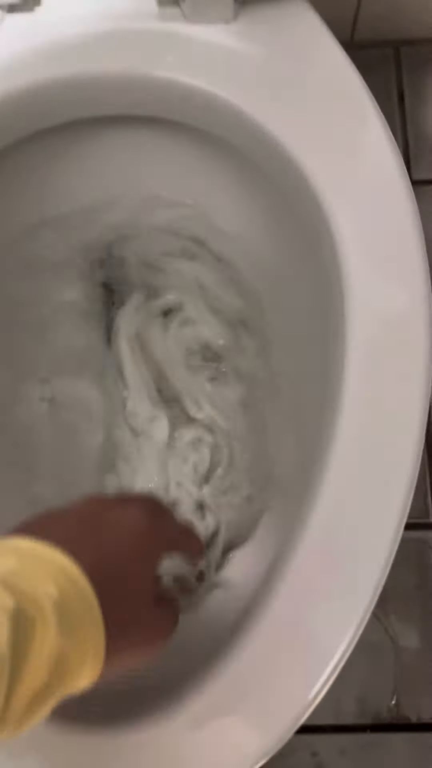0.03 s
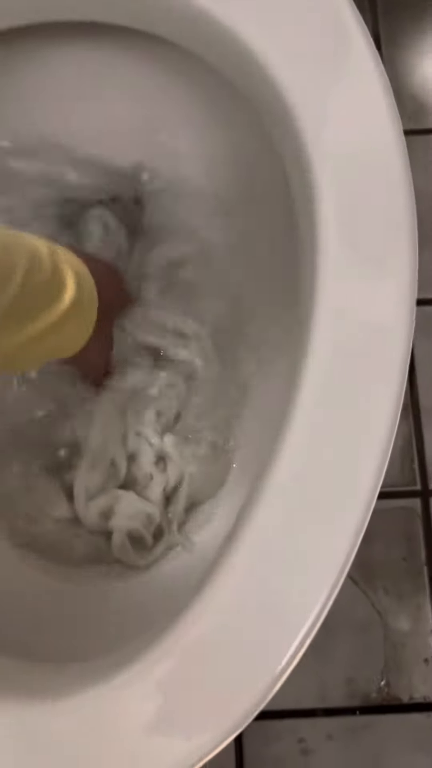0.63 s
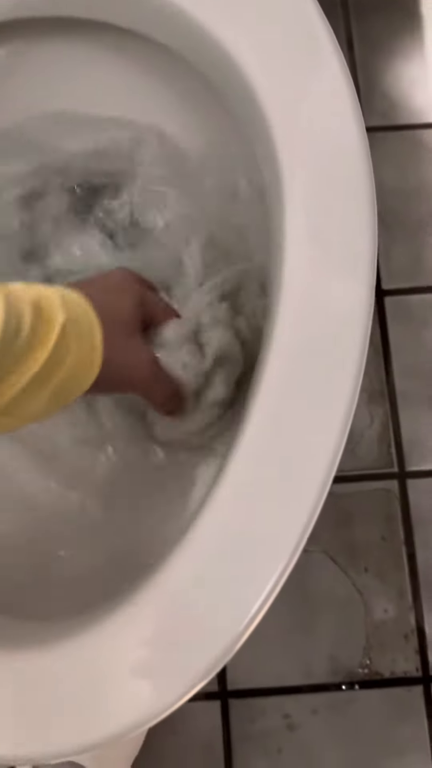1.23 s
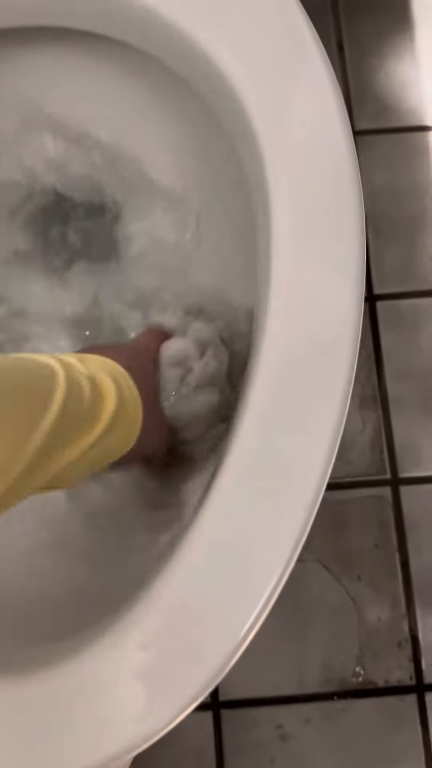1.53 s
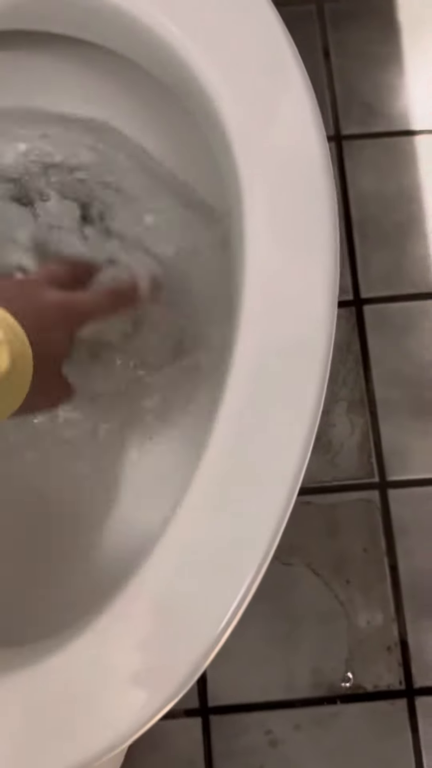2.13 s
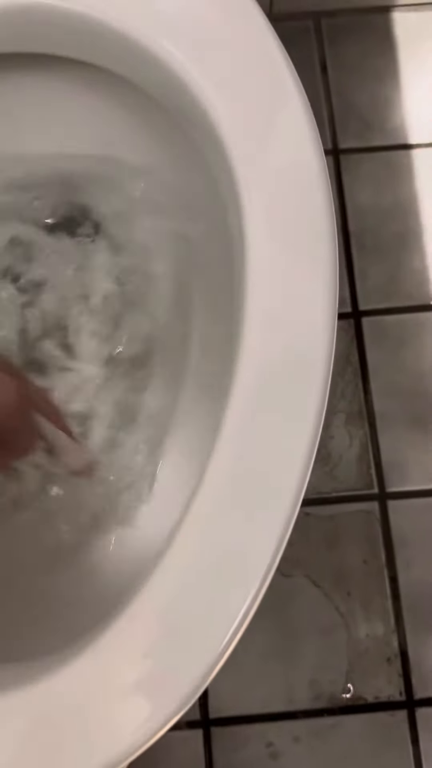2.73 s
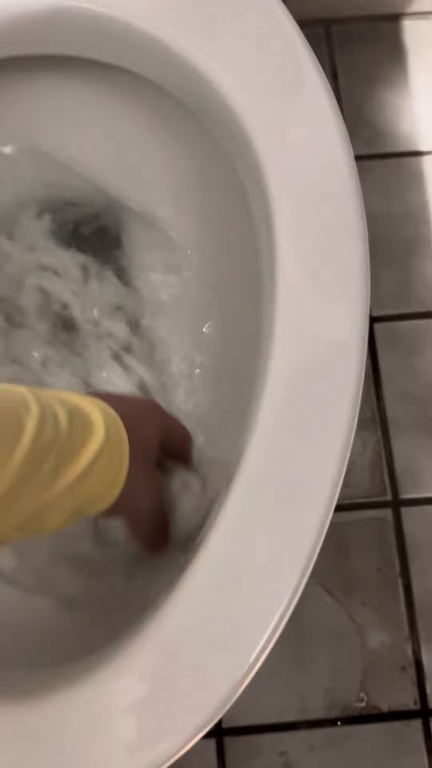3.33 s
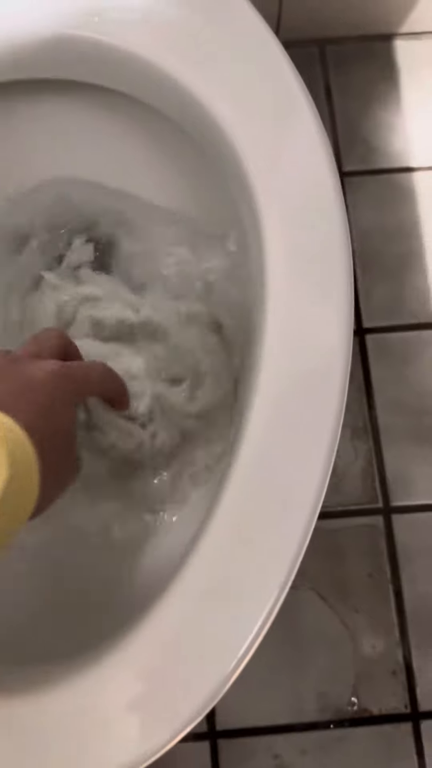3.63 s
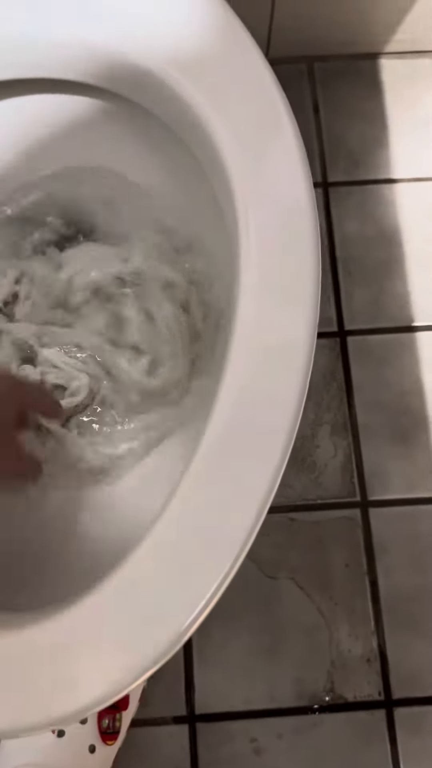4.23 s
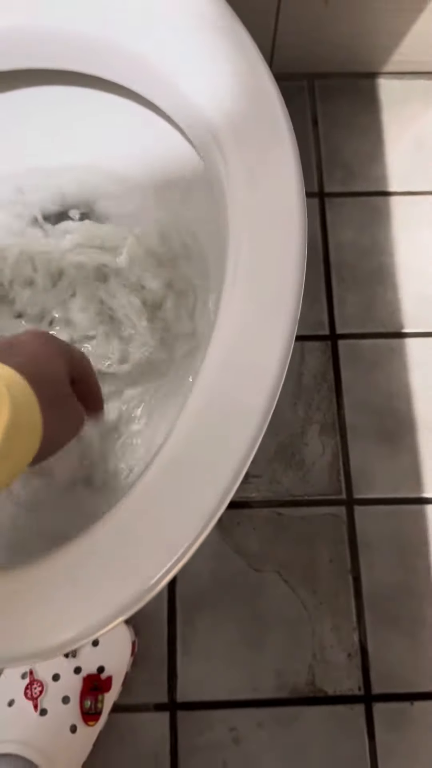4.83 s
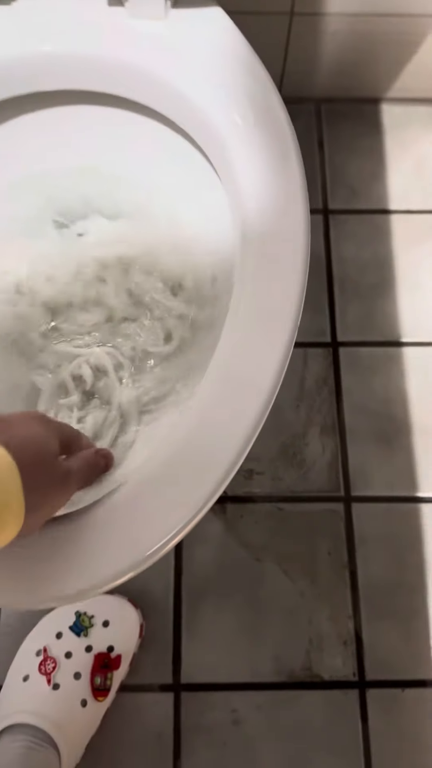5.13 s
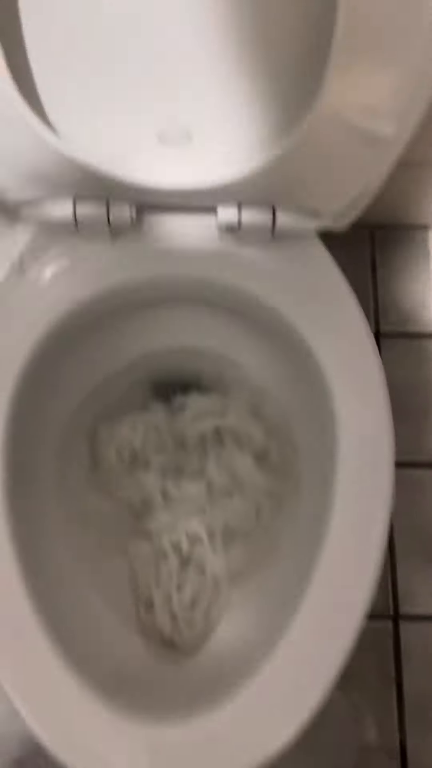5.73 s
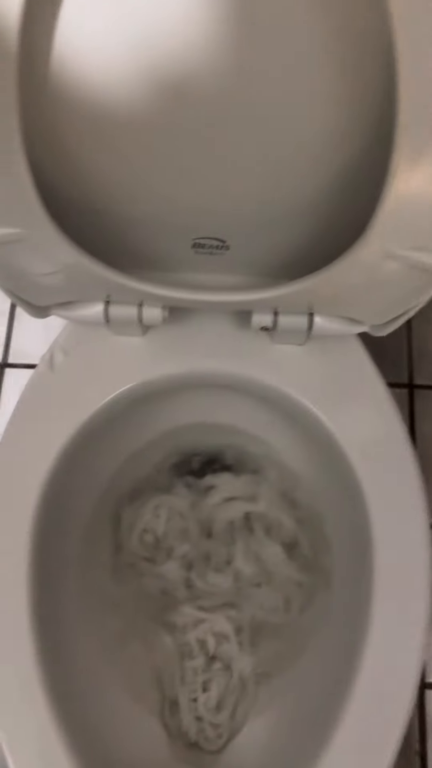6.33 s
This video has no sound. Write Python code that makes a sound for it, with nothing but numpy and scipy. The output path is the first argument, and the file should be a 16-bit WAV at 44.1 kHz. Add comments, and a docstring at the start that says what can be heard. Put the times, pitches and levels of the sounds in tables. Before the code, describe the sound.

A toilet runs on after a flush in a small tiled restroom, heard close on a hand-held microphone. Throughout, the valve hisses steadily, the pipes drone low and water washes down the bowl with a faint hollow roar. In the first 0.3 seconds, fingers rub and lightly bump the microphone. From the start until about 5 seconds, a hand stirs a sodden wad in the bowl: water sloshes in uneven surges and slaps the porcelain, with snapping drops and bubbly plops, all briefly echoed by the tiles. A sharp drip and plop stand out at 0.3 seconds, with clusters of splashes around 1.3 to 2.3 and 2.8 to 3.8 seconds. From about 4.6 seconds, as the stirring ends, a faint singing tone rises in the filling bowl. From 5.9 seconds, fingers rub and bump the microphone with a dull rumble, ending in a short scrape near 6.4 seconds.

```python
"""A toilet runs on after a flush in a small tiled restroom: throughout, turbulent flow hisses in the
valve, drones in the pipes and washes down the bowl. At first, fingers rub and bump a hand-held camera.
For five seconds a hand stirs a sodden wad in the bowl: water sloshes and slaps the porcelain, drops snap
and trapped air rings in plops, all echoed by the tiles. As the stirring ends, the stream sings in the
filling bowl. Last, the fingers rub and bump the camera again, ending in a scrape."""
import sys
import numpy as np
from scipy import signal
from scipy.fft import rfft, irfft, next_fast_len
from scipy.io import wavfile
from scipy.ndimage import uniform_filter1d, map_coordinates

SR = 44100
rng = np.random.default_rng(int(sys.argv[2]) if len(sys.argv) > 2 else 0)


def transcribe(signal):
    """Save signal, clipped to [-1, 1], as a 16-bit WAV file at the path in sys.argv[1]."""
    frames = np.atleast_2d(signal).T
    limited = np.clip(frames, -1, 1)
    pcm = np.round(limited * 32767).astype(np.int16)
    wavfile.write(sys.argv[1], SR, pcm)


N = 281799

# Spectra of the noise sources. Each row: frequency in Hz, relative spectral level in dB.
PIPE_SPECTRUM = [(15, -19), (28, -3), (40, -5), (65, 1.5), (100, 0), (160, -5), (260, -7), (350, -16),
                 (600, -25)]
TRAP_SPECTRUM = [(120, -40), (172, -13), (188, 1), (203, -5), (228, -13), (242, 3.5), (252, -4), (270, -20),
                 (350, -45)]
WASH_SPECTRUM = [(150, -33), (330, -4), (500, -1), (620, 1.5), (860, 0.5), (980, -6.5), (1300, -7.5),
                 (1900, -16), (2400, -7), (3100, -14.5), (4500, -18.5), (9000, -56)]
FILL_SPECTRUM = [(1200, -35), (1400, -12), (1480, 1), (1560, -13), (1750, -34)]
VALVE_SPECTRUM = [(1500, -25), (3000, -11.5), (3700, -7.5), (4500, -10), (5000, -8), (5300, -5.5),
                  (5620, -.5), (6100, -.5), (6700, -3), (7300, -1), (7950, -1), (8600, -5), (10300, -3.3),
                  (12000, -7.5), (15600, -9)]
RUB_SPECTRUM = [(60, -56), (170, -22), (260, -3.5), (400, 2.5), (560, -3), (760, -6), (900, -17),
                (1100, -12), (1300, -46), (2400, -23), (5000, -33)]
RUMBLE_SPECTRUM = [(20, -12), (60, 8.5), (120, 5), (300, 3.5), (560, 0.5), (700, -7), (1200, -9),
                   (1800, -17.5), (2500, -16.5), (4000, -45), (9000, -30), (15000, -46)]
SCRAPE_SPECTRUM = [(600, -36), (1200, -16), (2600, 0), (4200, -15), (8000, -7), (14000, -47)]
SLOSH_SPECTRUM = [(400, -48), (1000, -5), (1600, -3), (2200, 1.5), (3100, -3.5), (3900, -5), (5500, -13.5),
                  (9000, -1.5), (15000, -58)]
# Resonances of the pipes, tank and bowl, and of the camera's case when rubbed and when pressed.
# Each row: centre in Hz, width in Hz, lift in dB.
PLUMBING_MODES = [(59.4, 14, 9), (121.5, 6.7, 6.5), (142.5, 6.6, 11), (198, 26, 3), (290.5, 13, 11.5),
                  (312.9, 14.4, 13.5), (337.2, 11, 8), (367, 21, 7), (442, 16, 7), (472.6, 11, 7),
                  (497, 18, 6.5), (552, 11, 6), (602, 36, -3), (805, 33, 5), (865, 16, 5), (1092, 35, 8.5),
                  (1146, 31, 2), (1490, 95, 9.5), (1753, 29, 7), (2120, 72, 3), (3600, 250, 1.5),
                  (5500, 260, 1.5), (5930, 520, 3.5), (6930, 120, 4.5), (7450, 130, 5)]
CASE_MODES = [(337, 80, 4.4), (716, 79, 9.2), (1120, 39, 7.8)]
PRESSED_CASE_MODES = [(367, 110, 2), (470, 55, 6.3), (840, 58, 14), (1100, 60, 6)]
# Hollow roar of the trap. Each row: time in seconds, level in dB.
TRAP_LEVELS = [(0.4, -47.5), (1.0, -45.5), (1.6, -46), (2.2, -45), (2.7, -46.5), (3.7, -41.5), (4.1, -50.5),
               (4.65, -45), (5.1, -47.5), (5.9, -48.5)]
# Reverberation of the tiled room. Each row: frequency in Hz, t60 (time to fall 60 dB) in seconds.
ROOM_T60 = [(200, 0.68), (2000, 0.25), (6000, 0.56), (14000, 0.05)]
# Likeness of the noise at two microphones. Each row: frequency in Hz, correlation.
COHERENCE = [(130, .999), (290, 0.98), (500, 0.79), (750, 0.57), (1100, 0.65), (1500, 1), (2200, 1),
             (3100, 0.34), (3900, 0.81), (4900, 0.65), (5700, 0.87), (8700, 0.59), (10500, 1), (13000, 1),
             (15500, 1)]
# Phase between the microphones. Each row: frequency in Hz, lead of the right one in radians.
PHASE_LEAD = [(5000, 0), (5500, .45), (6300, .7), (8000, 1.7), (10300, 3.1), (13500, 3.2), (15700, 4.5)]
# Fingers sliding on the case. Each row: start and length in seconds, rub and rumble levels in dB.
FINGER_SLIDES = [(-.01, 0.067, -26.5, -65), (0.08, 0.096, -28.5, -61), (0.206, 0.075, -32.5, -55),
                 (5.87, 0.1, -39, -50), (5.97, 0.025, -35, -31), (6.044, 0.064, -45, -32.5),
                 (6.121, 0.036, -38, -23), (6.176, 0.064, -44, -28.5), (6.25, 0.16, -36.5, -32)]
# Fingers bumping the case. Each row: start in seconds, relative level in dB, pitch in Hz, t60 in seconds.
FINGER_BUMPS = [(0.039, -15.5, 355, 0.14), (0.146, -20, 713, 0.31), (6.0796, -8, 475, 0.052),
                (6.094, -14.5, 499, 0.22), (6.1188, -10.5, 460, 0.056), (6.13, -22, 831, 0.2),
                (6.138, -24.5, 134, 0.2), (6.143, -16.5, 458, .1), (6.255, -21, 109, 0.18),
                (6.297, -19, 378, 0.092), (6.321, -15.5, 368, 0.15), (6.339, -15.5, 456, 0.16),
                (6.343, -26.5, 862, 0.11)]
# Sweeps of the hand. Each row: fastest moment in seconds, relative level in dB, half length in seconds.
HAND_SWEEPS = [(0.052, -44, 0.23), (0.617, -44, 0.14), (1.394, -42, 0.29), (2.102, -44, 0.34),
               (3.075, -45, 0.27), (3.707, -44.5, 0.18)]
# Slaps of water on porcelain. Each row: start in seconds, relative level in dB, spray centre in Hz,
# spray t60 in seconds, pitch of the main bubble in Hz.
WATER_SLAPS = [(0.103, -30, 4250, .04, 3740), (0.574, -24.5, 6660, 0.038, 3300),
               (0.7016, -29.5, 3490, .03, 3470), (0.862, -31.5, 4800, 0.046, 4060),
               (1.244, -26.5, 5700, .05, 2860), (1.305, -33, 1207, 0.13, 1200),
               (1.343, -29.5, 3920, 0.038, 3770), (1.374, -32, 2160, .08, 2260),
               (1.3942, -27.5, 4750, 0.061, 4150), (1.396, -29.5, 3050, 0.054, 3200),
               (1.634, -22, 7300, 0.039, 4700), (1.7075, -26.5, 5300, 0.023, 4620),
               (1.748, -24.5, 6100, 0.039, 4390), (1.94, -31, 2420, 0.035, 2200),
               (1.95, -18, 8300, 0.028, 7720), (1.973, -32, 2480, 0.094, 2480),
               (2.098, -23.5, 3750, 0.033, 3700), (2.589, -31.5, 2660, .06, 3830),
               (2.712, -33.5, 4100, .02, 4120), (2.822, -35, 5200, 0.035, 4900),
               (2.855, -25.5, 3640, 0.03, 3920), (2.886, -27.5, 3580, 0.07, 4500),
               (3.0475, -27, 3800, 0.018, 4060), (3.1065, -27, 3270, 0.043, 3600),
               (3.137, -25, 8700, 0.061, 3520), (3.429, -31.5, 2960, 0.12, 4570),
               (3.494, -23, 8600, .022, 8100), (4.111, -33, 2430, 0.027, 2400),
               (4.117, -20, 10460, 0.019, 10800), (4.229, -31.5, 3830, 0.02, 3720),
               (4.609, -43, 1900, .02, 1870), (4.625, -34, 2990, 0.029, 2900),
               (4.9592, -23.5, 6370, 0.064, 5730)]
# Drops striking and films bursting. Each row: start in seconds, relative level in dB, centre in Hz,
# t60 in seconds.
DROP_SNAPS = [(0.3268, -5.5, 11600, 0.011), (.5794, -21, 7450, .014), (.6193, -27, 7000, 0.011),
              (.648, -31, 8000, .012), (1.3796, -18, 13000, 0.013), (1.9518, -13, 10500, .012),
              (2.095, -29, 5600, .008), (2.8544, -30, 3600, .016), (2.889, -27, 4600, .014),
              (3.05, -30, 3900, 0.011), (3.159, -29, 5000, .012), (3.4988, -22, 8500, 0.017),
              (4.171, -27, 13500, .01), (4.198, -21, 9300, 0.0096), (4.9505, -11, 10100, 0.019),
              (4.963, -25, 5800, .012)]
# Large air bubbles. Each row: start in seconds, relative level in dB, pitch in Hz, octaves risen per t60.
LARGE_BUBBLES = [(0.327, -14, 2410, 0.16), (0.5068, -28, 2330, 0.11), (0.6298, -26.5, 2180, 0.11),
                 (.641, -31, 2270, 0.11), (.643, -32, 1350, 0.18), (.812, -36.5, 2080, 0.17),
                 (.922, -33, 2060, .2), (0.966, -31, 1670, .15), (1.255, -22, 1810, .1),
                 (1.303, -31, 1600, 0.18), (1.37, -37, 1880, .1), (1.5226, -30, 2180, .1),
                 (1.538, -29, 2020, 0.083), (1.56, -33.5, 1286, .2), (1.6368, -28, 2090, .1),
                 (1.677, -38, 1750, .1), (1.9, -30, 1680, 0.082), (1.9073, -20.5, 1107, 0.39),
                 (1.953, -26.5, 2000, 0.97), (1.9845, -27.5, 2090, 0.091), (1.986, -32, 1390, 0.22),
                 (2.11, -30, 1930, 0.12), (2.3261, -17.5, 1710, 0.092), (2.332, -26, 2260, .2),
                 (2.591, -30, 1500, 0.57), (2.949, -33.5, 1115, 0.16), (3.1072, -25.5, 2480, .2),
                 (3.159, -24, 2630, 0.16), (3.2406, -23, 2450, 0.27), (3.661, -35, 1950, .2),
                 (3.6654, -23.5, 1212, 0.83), (3.706, -32, 1800, .2), (3.7705, -18.5, 2066, 0.55),
                 (3.838, -33, 1274, 0.42), (3.87, -35, 2020, 0.22), (4.171, -27.5, 2350, 0.16),
                 (4.602, -36, 1950, 0.22), (4.693, -33, 1980, .1), (4.919, -34, 2020, 0.47)]

TOP_HZ = 15800


def amp(db):
    """Amplitude ratio of a level in decibels."""
    return 10 ** (np.asarray(db) / 20)


def unit(x):
    """Normalisation to rms 1."""
    return x / np.sqrt(np.mean(x ** 2) + 1e-20)


def along(points, hz):
    """Interpolation of (Hz, value) points on a logarithmic frequency axis."""
    point_hz, values = np.transpose(points)
    return np.interp(np.log(hz + 1), np.log(point_hz + 1), values)


def wobble(rate_hz):
    """Slow random modulation: a spline through Gaussian knots."""
    knots = rng.standard_normal(int(N * rate_hz / SR) + 4)
    return map_coordinates(knots, [np.arange(N) * rate_hz / SR])


def filtered(x, response):
    """Linear filtering: the spectrum is multiplied by a frequency response."""
    length = x.shape[-1]
    padded = next_fast_len(length + 8192)
    return irfft(rfft(x, padded) * response(np.fft.rfftfreq(padded, 1 / SR)), padded)[..., :length]


def add(track, start, sound):
    """Superposition of a sound on a track, from start seconds on."""
    part = track[max(round(start * SR), 0):][:len(sound)]
    part += sound[:len(part)]


def rush(spectrum, patchy_db, modes=()):
    """Partly coherent stereo noise of rms 1, fluctuating in patches of time and frequency."""
    def response(hz):
        lift_db = sum(db / (1 + (2 * (hz - centre) / width) ** 2) for centre, width, db in modes)
        angle = np.arccos(np.clip(along(COHERENCE, hz), -1, 1)) / 2
        return amp(along(spectrum, hz) + lift_db) * [np.cos(angle), np.sin(angle)]

    cells = signal.stft(rng.standard_normal((2, N)), nperseg=512)[2]
    patches = uniform_filter1d(rng.standard_normal(cells.shape[1:]), size=5, axis=0)
    patches = unit(uniform_filter1d(patches, size=7, axis=1))
    pair = signal.istft(cells * amp(patchy_db * patches), nperseg=512)[1][:, :N]
    mid, side = filtered(pair, response)
    return unit(np.array([mid + side, mid - side]))


def ring(hz, t60, rise, attack):
    """A damped oscillator of peak 1 whose pitch climbs by rise octaves per t60."""
    t = np.arange(int(1.5 * t60 * SR) + 2) / SR
    phase = 2 * np.pi * np.cumsum(hz * 2 ** (rise * t / t60)) / SR
    envelope = np.exp(-np.log(1000) * t / t60) * (1 - np.exp(-t / attack))
    return envelope / envelope.max() * np.sin(phase)


def running_water():
    """Turbulent flow excites the plumbing's resonances; as the tank fills, wash falls and hiss rises."""
    t = np.arange(N) / SR
    drone = amp(-42.5) * rush(PIPE_SPECTRUM, patchy_db=1, modes=PLUMBING_MODES)
    trap = amp(np.interp(t, *np.transpose(TRAP_LEVELS))) * rush(TRAP_SPECTRUM, patchy_db=1.5)
    wash = amp(-39.5 - 0.1867 * t) * rush(WASH_SPECTRUM, patchy_db=1.5, modes=PLUMBING_MODES)
    left_alone = np.clip((t - 4.56) / 0.4, 0, 1)  # fades in as the stirring ends
    singing = amp(-56) * left_alone * rush(FILL_SPECTRUM, patchy_db=1)
    hiss = amp(-41 + 0.3049 * t) * rush(VALVE_SPECTRUM, patchy_db=1, modes=PLUMBING_MODES)
    return drone + trap + wash + singing + hiss


def tile_echo(x):
    """Reverberation: after 4 ms, reflections from the tiles decay at a rate set by frequency."""
    hz, t, cells = signal.stft(rng.standard_normal((2, SR // 2)), SR, nperseg=256)
    decay = np.exp(-np.log(1000) * t / along(ROOM_T60, hz)[:, None])
    mid, side = signal.istft(cells * decay, SR, nperseg=256)[1]
    tail = np.array([mid + 0.054 * side, mid - 0.16 * side])
    delayed = np.pad(x, (SR // 250, 0))
    return signal.fftconvolve(delayed[None], tail / np.linalg.norm(tail[0]), axes=1)[:, :N]


def slide(start, length, attack_s=0.0043, fade_db_per_s=171):
    """Friction envelope of one finger slide: linear attack, hold, exponential decay."""
    t = np.arange(N) / SR - start
    return np.clip(t / attack_s, 0, 1) * amp(-fade_db_per_s * np.maximum(t - length, 0))


def camera_handling():
    """Stick-slip friction and impacts of the fingers excite the boxy modes of the camera's case."""
    slides = [np.outer(amp([rub_db, rumble_db]), slide(start, length))
              for start, length, rub_db, rumble_db in FINGER_SLIDES]
    rubbing, pressing = np.max(slides, axis=0)
    rub = rubbing * amp(0.23 * wobble(70)) * rush(RUB_SPECTRUM, patchy_db=-0.5, modes=CASE_MODES)
    rumble = pressing * rush(RUMBLE_SPECTRUM, patchy_db=3, modes=PRESSED_CASE_MODES)
    scrape_db = -36 - 122 * np.abs(np.arange(N) / SR - 6.38)  # the last slide brightens into a scrape
    scrape = amp(scrape_db) * rush(SCRAPE_SPECTRUM, patchy_db=-2.5)
    knocks = np.zeros(N)
    for start, db, hz, t60 in FINGER_BUMPS:
        add(knocks, start, amp(db - 7) * ring(hz, t60, rise=0, attack=0.0017))
    return (rub + knocks) * amp([[1], [-1]]) + rumble + scrape


def bubbles(count, pitch_hz, octaves, cycles, size_db):
    """Small bubbles resonate at random times, most faint and a few strong; the cloud has rms 1."""
    cloud = np.zeros(N)
    for when, size, draw_a, draw_b in rng.random((count, 4)):
        hz = min(pitch_hz * 2 ** (octaves * (draw_a + draw_b - 1)), TOP_HZ)
        gain = amp(size_db * min(-np.log(1 - size), 4))
        add(cloud, when * N / SR, gain * ring(hz, cycles / hz, rise=0.12, attack=1 / hz))
    return unit(cloud)


def sloshing(rest_db=-52):
    """Sweeps of the hand add in power to the restless water, modulating turbulence and bubbles alike."""
    t = np.arange(N) / SR
    sweep_power = sum(amp(db) ** 2 * np.exp(-((t - fastest) / half_length) ** 2)
                      for fastest, db, half_length in HAND_SWEEPS)
    surge = np.sqrt(amp(rest_db) ** 2 + sweep_power) * amp(0.75 * wobble(20.95))
    churn = amp(-3) * rush(SLOSH_SPECTRUM, patchy_db=7, modes=PLUMBING_MODES)
    gurgle = amp(-7.5) * bubbles(count=1000, pitch_hz=1900, octaves=1.1, cycles=32, size_db=2.7)
    crackle = amp(-14) * bubbles(count=700, pitch_hz=5000, octaves=1.2, cycles=40, size_db=4)
    return surge * (churn + gurgle + crackle)


def spray(centre_hz, octaves, t60, spiky_db):
    """Random droplet impacts sum to a decaying noise band, with a half width given in octaves."""
    t = np.arange(SR // 5) / SR
    drops = rng.standard_normal(len(t)) * amp(spiky_db * rng.standard_normal(len(t)))
    band = filtered(drops, lambda hz: 1 / np.sqrt(1 + (np.log2((hz + 1) / centre_hz) / octaves) ** 4))
    return unit(band) * np.exp(-np.log(1000) * t / t60) * (1 - np.exp(-t / (0.04 * t60)))


def splashes(octaves=0.89):
    """Air entrainment: each slap on the porcelain throws spray and traps one main bubble and six more."""
    track = np.zeros(N)
    for start, db, centre_hz, t60, bubble_hz in WATER_SLAPS:
        add(track, start, amp(db - 3.5) * spray(centre_hz, octaves, t60, spiky_db=6))
        detuning = 1 + np.log2(bubble_hz / centre_hz) ** 2  # far from the spray's band, the drive is weak
        main_bubble = ring(bubble_hz, t60=68 / bubble_hz, rise=0.12, attack=0.003)
        add(track, start, amp(db - 7.5) / detuning * main_bubble)
        for delay, step in rng.random((6, 2)):
            hz = min(centre_hz * 2 ** (1.4 * octaves * (step - 0.5)), TOP_HZ)
            faint_bubble = ring(hz, t60=70 / hz, rise=0.12, attack=4 / hz)
            add(track, start + 0.3 * t60 * delay, amp(db - 11 - 6 * delay) * faint_bubble)
    return track


def snaps():
    """Impulsive excitation: a drop strikes or a film bursts, and the bowl answers with a faint hiss."""
    track = np.zeros(N)
    for start, db, centre_hz, t60 in DROP_SNAPS:
        crack = spray(centre_hz, octaves=0.6, t60=t60, spiky_db=2)
        tail = amp(-29) * spray(centre_hz, octaves=0.8, t60=0.06, spiky_db=2)
        add(track, start, amp(db - 4) * (crack + tail))
    return track


def plops(cycles=69):
    """Bubble resonance: trapped air rings, rising in pitch as it nears the surface."""
    track = np.zeros(N)
    for start, db, hz, rise in LARGE_BUBBLES:
        add(track, start, amp(db - 3.5) * ring(hz, cycles / hz, rise, attack=0.0016))
        # The closing cavity squelches and sheds three small bubbles.
        squelch_db = db - 12 + 0.3 * max(-22 - db, 0)  # a greater share in faint plops
        add(track, start, amp(squelch_db) * spray(hz, octaves=0.22, t60=0.038, spiky_db=3))
        for delay, step in rng.random((3, 2)):
            shed_bubble = ring(hz * 2 ** (0.56 * step - 0.2), t60=0.022, rise=0.63, attack=0.002)
            add(track, start + 0.016 * delay, amp(db - 27) * shed_bubble)
    return track


def scene():
    """Superposition of the running water, the stirred water with its echo, and the hand on the camera."""
    stirred = plops() + splashes() + snaps() + sloshing()
    echo = amp(-10) * tile_echo(stirred.mean(axis=0))
    water = running_water() + stirred + echo
    return water * amp([[0.15], [-0.15]]) + camera_handling()


def record(dry):
    """Phase shift and band limit: the right microphone leads in the treble, and both stop at TOP_HZ."""
    left_right = np.array([[-1], [1]])
    return filtered(dry, lambda hz: np.exp(0.5j * along(PHASE_LEAD, hz) * left_right) * (hz < TOP_HZ))


dry = scene()
out = record(dry)
transcribe(out)
```